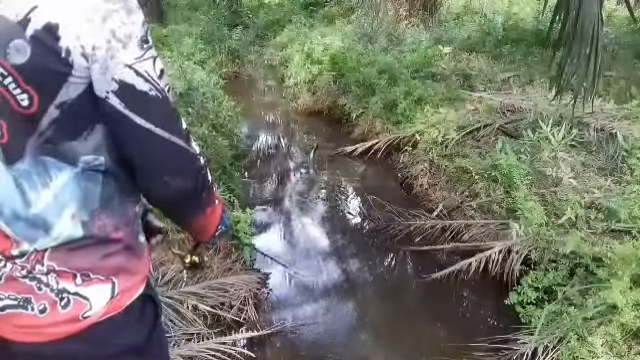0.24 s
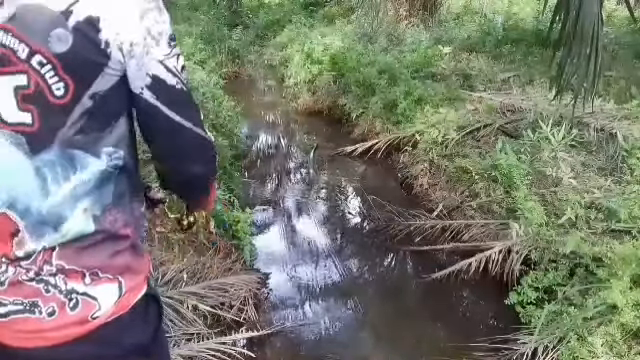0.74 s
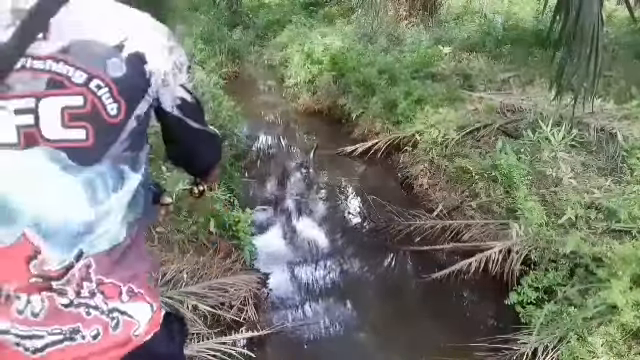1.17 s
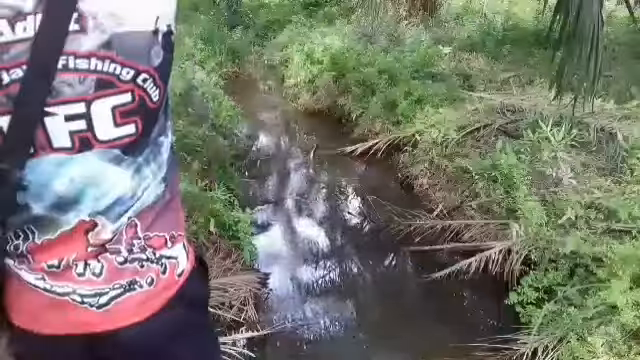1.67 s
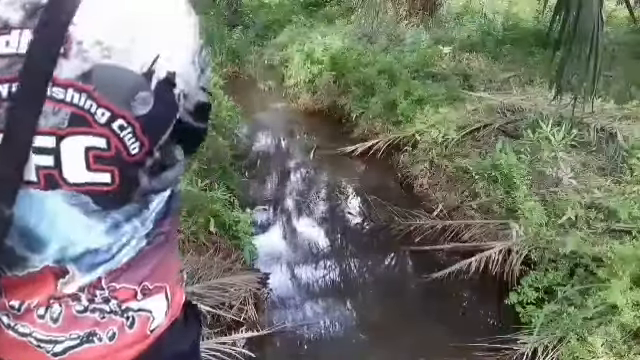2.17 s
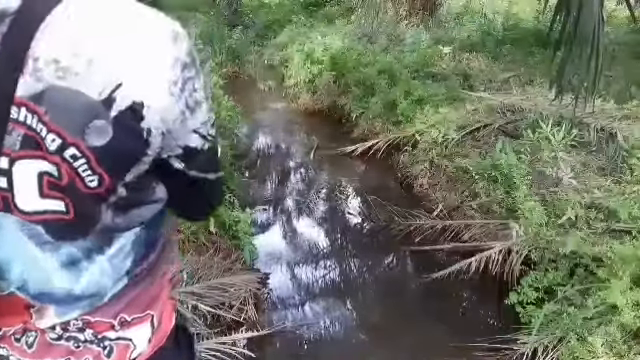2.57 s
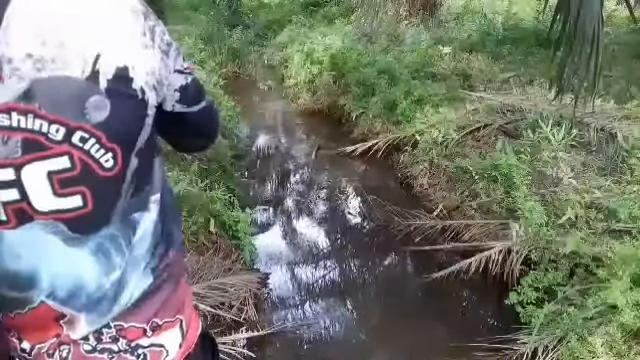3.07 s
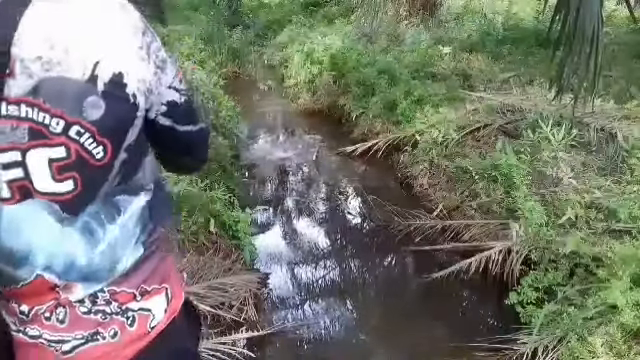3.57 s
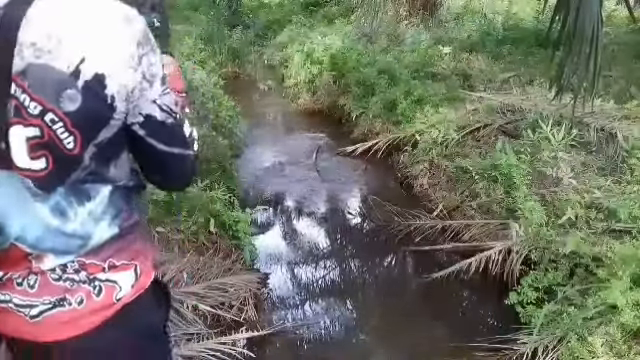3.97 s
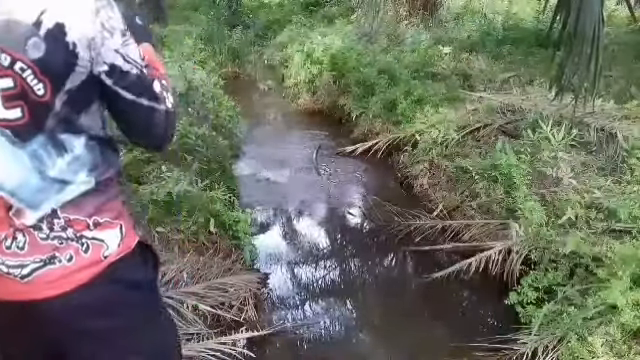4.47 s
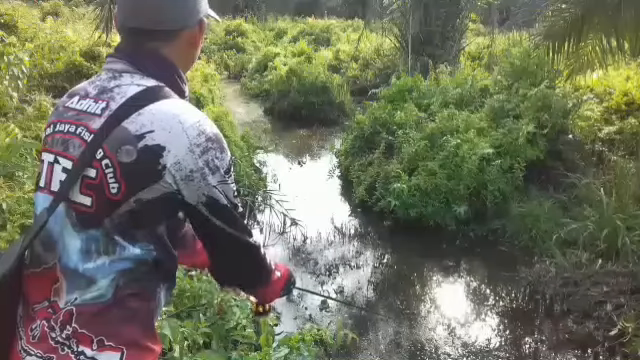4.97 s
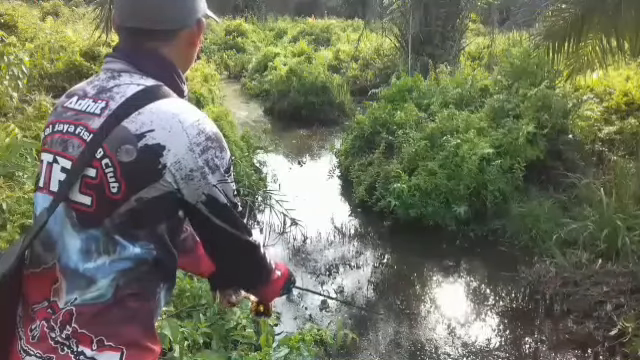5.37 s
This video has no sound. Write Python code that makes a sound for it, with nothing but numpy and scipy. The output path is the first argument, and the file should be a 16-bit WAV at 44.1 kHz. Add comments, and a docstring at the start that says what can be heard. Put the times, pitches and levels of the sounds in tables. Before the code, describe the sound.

Dry palm fronds snap, crackle and rustle underfoot with a brief bell jingle, then water thrashes and splashes before an abrupt cut to quiet birdsong.

```python
"""On the bank of a ditch an angler shifts his footing through dry palm fronds: stems snap as clicks with tearing
noise, leaflets and litter crackle as clumped grains, and the little bells on his rod ring from rattling strikes.
Then something thrashes in the water, with noisy slaps, spray and ringing bubbles, over a cricket's pulsing tone.
The scene changes abruptly to a quiet stretch of the ditch: small birds chirp in gliding sines and insects shrill
as narrow hiss."""
import sys
import numpy as np
from scipy import signal
from scipy.fft import rfft, irfft, next_fast_len
from scipy.io import wavfile

SR = 44100
rng = np.random.default_rng(int(sys.argv[2]) if len(sys.argv) > 2 else 0)


def unload_audio(sound):
    """Save the sound as a 16-bit wav file, at the path given as the first command line argument."""
    columns = np.transpose(np.atleast_2d(sound))
    # keep every value between -1 and 1, then stretch to whole-number steps
    steps = np.round(np.clip(columns, -1, 1) * 32767)
    wavfile.write(sys.argv[1], SR, steps.astype(np.int16))


N = 248283
TIME = np.arange(N) / SR
CHANGE_S = 4.821
CUTOFF_HZ = 15600

# snapping stems, thick ones heavy and dry ones sharp: t/s, crack level/dB before the band levels,
# weight level/dB, sharpness level/dB
STEM_SNAPS = [(0.8177, -59, 12, -7), (1.1133, -58, 11, -11), (1.261, -52, 7, -14),
              (1.2911, -48.5, 9.5, -19), (1.317, -32.5, -8, -13), (1.33, -43, -12, -6),
              (1.3392, -47, 13, -3), (1.407, -45, 14.5, 10), (1.4503, -42, -4, -17), (1.523, -33, -25, -11),
              (1.568, -45, 5, 0), (1.5971, -31, 5, 5.5), (1.629, -38.5, -1, 1), (1.7116, -44.5, 5.5, -6),
              (1.8889, -36.5, -3, -5), (1.9628, -31.5, 6.5, 6.5), (1.9856, -38, 4, 2), (2.0088, -41, 3, 10),
              (2.013, -40, 3, 5), (2.0353, -45, 12.5, 9), (2.0486, -43, -1, 8.5), (2.1127, -25, 2.5, -0.5),
              (2.155, -45.5, -1, 6), (2.191, -45.5, 3, -10), (2.2188, -44.5, 11, -5), (2.3031, -40, 7, 0),
              (2.3335, -49, -7, 9.5), (2.382, -43.5, 3, 5), (2.397, -28.5, 3, 14.5), (2.4156, -32.5, 2, -6),
              (2.4835, -47.5, 4, 3), (2.568, -32, -10, -18), (2.585, -46, 22, -24), (2.736, -47, -23, -10),
              (2.782, -57, 10, 13.5), (2.794, -47, 3.5, 8), (3.0925, -47.5, 7, -18),
              (3.1142, -54, 16.5, -21)]
# bands of a snap: low f/Hz, high f/Hz, relative level/dB, tearing t/s, share of the weight [1], of the sharpness [1]
SNAP_BANDS = [(634, 1590, -20, 0.0027, 1.0, 0.19), (269, 550, -32, .002, 1.0, 0.2),
              (1240, 3470, -12.5, 0.0023, 0.9, 0), (3420, 5110, 0, 0.0012, 0.044, 0.039),
              (5430, 6930, -13.5, 0.00071, 0.15, 0.66), (10400, 17000, -25, 0.00084, 0.22, 0.41),
              (7660, 9200, -23.5, 0.00068, 0, 1.52)]

# how much the undergrowth is stirred: t/s, level/dB
STIR = [(0.7, -83), (1.02, -82), (1.11, -68.5), (1.29, -67), (1.42, -57), (2.48, -56.5), (2.8, -59),
        (3.05, -70), (3.2, -63.5), (3.38, -59.5)]
# a frond sweeps along the body: t/s, hold t/s, level/dB
FROND_SWEEPS = [(0.81, .01, -69), (1.325, 0.014, -54), (1.41, .005, -49.5), (1.505, 0.097, -44.5),
                (1.88, .015, -47), (1.965, 0.022, -45.5), (2.025, .005, -50), (2.222, 0.0043, -51),
                (2.31, 0.03, -53.5), (2.41, 0.043, -53)]
SWEEP_ATTACK_S, SWEEP_RELEASE_S = 0.024, 0.034
# weight comes down on the litter: t/s, hold t/s, level/dB
FOOTSTEPS = [(1.41, 0.0045, -57.5), (1.475, 0.013, -49.5), (1.643, 0.017, -52.5), (1.89, 0.0042, -56),
             (2.22, 0.0047, -51), (2.32, 0.04, -61), (2.83, 0.1, -60)]
STEP_ATTACK_S, STEP_RELEASE_S = 0.019, 0.032
# colour of the leaflets flicking: f/Hz, relative level/dB
LEAFLET_COLOUR = [(100, -43), (900, -22.5), (2000, -12), (3000, -10), (4300, 3.5), (5400, -9),
                  (7500, -20.5), (9000, -21.5), (11500, -32), (15500, -30)]
# colour of single leaflets cracking: f/Hz, relative level/dB
CRACKLE_COLOUR = [(1200, -9), (2200, 0.5), (3200, 1.5), (4400, -1), (6000, -9.5), (9000, -26)]
# colour of small twigs ticking: f/Hz, relative level/dB
TWIG_COLOUR = [(200, -20), (900, -4), (2500, -3), (4200, 6), (5600, -9), (9000, -25), (15500, -22)]
# colour of the crushed litter: f/Hz, relative level/dB
LITTER_COLOUR = [(40, -6), (120, -8), (250, -2.5), (500, 2.5), (900, 2.5), (1400, 1), (2200, -1),
                 (4000, -4), (9000, -33)]
# a boot rubs softly with a hollow note: t/s, hold t/s, level/dB
BOOT_RUB = (3.7, 0.067, -61.5)
RUB_HZ, RUB_WIDTH_HZ = 1450, 170

# the rod is jolted and shakes its twin bells: t/s, hold t/s, low bell level/dB, high bell level/dB before the trims
ROD_JOLTS = [(1.51, 0.059, -48, -60.5), (1.58, 0.0091, -47, -51.5), (1.792, .03, -71, -69),
             (2.998, 0.018, -71, -83)]
JOLT_ATTACK_S, JOLT_RELEASE_S = 0.021, 0.037
# modes of the low bell: f/Hz, relative level/dB, t60 t/s
LOW_BELL_MODES = [(6420, -1, 0.05), (6300, -3, 0.029), (6770, -6, 0.034), (12000, -23, .02),
                  (13400, -22, .02)]
# modes of the high bell: f/Hz, relative level/dB, t60 t/s
HIGH_BELL_MODES = [(9890, -6, 0.04), (10020, -2.5, 0.036), (14900, -11, .015), (15100, -11, .015)]

# unrest of the water, before the trims of spray and bubbles: t/s, level/dB
WATER_UNREST = [(3.22, -85), (3.37, -68), (3.42, -49.5), (3.72, -53.5), (4.1, -48), (4.3, -52), (4.55, -50),
                (4.7, -53.5), (4.77, -60.5), (4.83, -51.5)]
# thrashes at the surface, before the trims: t/s, slap level/dB, spray level/dB, bubbles level/dB
THRASHES = [(3.277, -54, -71, -54), (3.386, -27, -49, -52.5), (3.6093, -36, -54, -50),
            (3.726, -34, -73, -51.5), (3.781, -44, -51, -49.5), (3.873, -37, -49, -50.5),
            (4.023, -39, -44.5, -52), (4.105, -52, -61, -50), (4.16, -25.5, -45.5, -49),
            (4.484, -45, -61, -48), (4.56, -36, -48.5, -44.5), (4.596, -34, -63, -45),
            (4.705, -53, -50.5, -52), (4.8104, -35, -49, -63)]
THRASH_ATTACK_S, THRASH_HOLD_S, SPRAY_RELEASE_S, BUBBLE_RELEASE_S = 0.011, 0.019, 0.04, 0.041
# the thrashing digs deepest midway and draws gulps of air: t/s, hold t/s, level/dB against the small bubbles
DEEP_CHURN = (3.75, 0.045, -8.5)
DEEP_ATTACK_S, DEEP_RELEASE_S = 0.41, 0.45
# colour of the spray: f/Hz, relative level/dB
SPRAY_COLOUR = [(100, -16.5), (800, -20.5), (1800, -7.5), (3000, -4), (3800, 3), (4400, 5), (5300, -5),
                (7000, -18.5), (10000, -29), (15500, -41)]
# colour of single drips: f/Hz, relative level/dB
DRIP_COLOUR = [(1500, -6), (2300, 2), (3200, 0), (4600, -1)]
# colour of the small bubbles: f/Hz, relative level/dB
BUBBLE_COLOUR = [(400, -23), (600, -18), (800, -0.5), (1400, 1), (2200, -4.5), (3200, -9.5)]
# colour of the deep gulps: f/Hz, relative level/dB
GULP_COLOUR = [(130, -24), (280, -7.5), (480, 0), (700, -1)]
# the largest air pockets closing: t/s, peak level/dB before the trim, starting f/Hz
AIR_POCKETS = [(3.284, -47.5, 680), (3.396, -34, 1105), (3.412, -36.5, 2110), (3.417, -40.5, 750),
               (3.437, -40.5, 880), (3.573, -34, 1450), (3.582, -41, 746), (3.656, -39.5, 886),
               (3.77, -47.5, 297), (4.071, -40, 1240), (4.129, -37.5, 1146), (4.16, -35.5, 1240),
               (4.424, -30.5, 2970), (4.488, -45.5, 760), (4.565, -38.5, 976), (4.608, -36, 722),
               (4.703, -37.5, 2250), (4.73, -40.5, 900)]
# colour of water slapped flat: f/Hz, relative level/dB
SPLAT_COLOUR = [(100, -31), (500, -24), (1000, -4), (2200, 0.5), (3000, 1), (4400, 6), (5400, -9.5),
                (7000, -51), (15500, -44)]

# bird chirps: t/s, length t/s, middle f/Hz, glide f/Hz from start to end, peak level/dB before the trim
BIRD_CHIRPS = [(4.287, 0.065, 3710, 4, -47), (4.329, 0.0497, 3690, 454, -44), (4.877, .031, 3980, 203, -58),
               (4.909, 0.042, 4290, -350, -57), (5.03, 0.064, 2500, 450, -71),
               (5.066, .043, 3730, -200, -67), (5.133, 0.026, 4500, -400, -51),
               (5.218, 0.03, 4080, 222, -57.5), (5.246, 0.013, 3820, -750, -62),
               (5.33, 0.039, 4000, -550, -51.5), (5.345, 0.018, 2340, 300, -68),
               (5.389, 0.031, 4303, -600, -56), (5.419, 0.018, 3770, 380, -55),
               (5.449, .024, 4660, -450, -57.5), (5.479, 0.019, 3800, -1000, -63),
               (5.515, .032, 4080, 44, -51), (5.538, 0.022, 4100, -1300, -53.5),
               (5.568, .019, 3580, 440, -60), (5.575, 0.0324, 3610, -1050, -57.5)]
# more birds twitter further off in the second scene; the level is before the same trim
TWITTER_NOTES, TWITTER_NOTE_S, TWITTER_DB = 16, 0.0244, -68
TWITTER_HZ, TWITTER_SPREAD_HZ, TWITTER_GLIDE_HZ = 4000, 450, -700

# shrilling insects after the change of scene: f/Hz, width f/Hz, level/dB
INSECT_BANDS = [(8130, 280, -79), (8480, 240, -79.5), (9300, 910, -80.5)]
# colour of the still air before the change of scene: f/Hz, relative level/dB
NEAR_AIR = [(25, -22), (50, -9), (100, -10.5), (150, -6.5), (300, -8), (750, -11), (1500, -14),
            (2800, -19.5), (3900, -21), (5500, -25), (9300, -24), (11500, -26), (15500, -27)]
# colour of the still air after the change of scene: f/Hz, relative level/dB
FAR_AIR = [(25, -9), (50, -12), (100, -13.5), (200, -9.5), (500, -9.5), (1200, -13.5), (2400, -16),
           (3000, -19.5), (4400, -18.5), (5400, -23), (7000, -24.5), (15500, -28)]
NEAR_AIR_DB, FAR_AIR_DB = -67.5, -67.5
# left-right likeness of the air: f/Hz, correlation [0-1]
AIR_LIKENESS = [(30, 0.9), (100, 0.58), (300, 0.59), (1000, 0.34), (4000, 0.25), (8500, 0), (13000, 0)]


def from_db(db):
    """Decibels to an amplitude gain."""
    return 10 ** (np.asarray(db) / 20)


def rms_one(x):
    """Scale a sound to an RMS of 1."""
    return x / np.sqrt(np.mean(x ** 2) + 1e-20)


def gains(rows):
    """A level curve as a gain at every sample, silent outside its span."""
    s, db = np.transpose(rows)
    return from_db(np.interp(TIME, s, db, left=-200, right=-200))


def at_hz(points, hz):
    """Read a spectrum at any frequency, interpolating along log frequency."""
    points_hz, values = np.transpose(points)
    return np.interp(np.log(hz + 1), np.log(points_hz), values)


def add(out, s, sound):
    """Mix a sound in at time s."""
    at = max(round(s * SR), 0)
    out[at:at + len(sound)] += sound[:max(N - at, 0)]


def band(x, low_hz, high_hz):
    """Band-pass filter."""
    return signal.sosfilt(signal.butter(2, [low_hz, high_hz], "band", fs=SR, output="sos"), x)


def colour(x, spectrum):
    """Causal (minimum-phase) filter with the given spectrum."""
    size = 2 * next_fast_len(N // 2 + 4096)
    level_db = at_hz(spectrum, np.arange(size // 2 + 1) * SR / size)
    cepstrum = irfft(np.log(from_db(level_db)))
    # folding the cepstrum forward in time makes the filter causal
    cepstrum[1:size // 2] *= 2
    cepstrum[size // 2 + 1:] = 0
    return irfft(rfft(x, size) * np.exp(rfft(cepstrum)))[..., :N]


def drift(rate):
    """Slow smooth chance with a spread of 1, computed at every 40th sample."""
    r = np.exp(-80 * np.pi * rate / SR)
    noise = rng.standard_normal(N // 40 + 2002)
    slow = signal.lfilter([1], [1, -2 * r, r * r], noise)[2000:]  # skip the run-in
    return np.interp(np.arange(N) / 40, np.arange(len(slow)), rms_one(slow))


def grains(per_s, spread_db, clump_db):
    """Random clicks of uneven size and either sign that come in clumps; sizes and clumps are capped."""
    sizes = from_db(spread_db * np.minimum(rng.exponential(1, N), 4)) * rng.choice([-1, 1], N)
    clumps = np.minimum(drift(57), 1.5)
    happens = rng.random(N) < per_s / SR
    return sizes * happens * from_db(clump_db * clumps)


def ring(clicks, hz, t60):
    """A unit click sets a decaying sine of height 1 ringing."""
    r, w = from_db(-60 / (t60 * SR)), 2 * np.pi * hz / SR
    return signal.lfilter([0, np.sin(w)], [1, -2 * r * np.cos(w), r * r], clicks + 1e-18)


def ringing_grains(spectrum, per_s, cycles, spread_db, count=28):
    """Grains of all pitches, each ringing for some cycles; they radiate little below their pitch."""
    born = grains(per_s, spread_db, clump_db=2.0)
    dealt = rng.integers(0, count, N)  # which pitch each grain gets
    rings = np.zeros(N)
    for k, hz in enumerate(np.geomspace(spectrum[0][0], spectrum[-1][0], count)):
        rings += from_db(at_hz(spectrum, hz)) * ring(born * (dealt == k), hz, cycles / hz)
    return rms_one(np.diff(rings, prepend=0))


def swells(rows, attack_s, release_s):
    """Each (s, hold s, dB) rises to its level at s, holds and dies away exponentially; their powers add up."""
    power = np.zeros(N)
    for s, hold_s, db in rows:
        fall = np.maximum(s - TIME, 0) / attack_s + np.maximum(TIME - s - hold_s, 0) / release_s
        power += (from_db(db) * np.exp(-np.minimum(fall, 20))) ** 2
    return np.sqrt(power)


def snaps(tearing=0.36, edge=0.031):
    """A stem breaks with one sharp release, then its fibres tear for a millisecond or two."""
    out, t = np.zeros(N), TIME[:SR // 50]
    for s, crack_db, weight_db, sharp_db in STEM_SNAPS:
        for low_hz, high_hz, db, decay_s, heavy, sharp in SNAP_BANDS:
            fibres = tearing * rng.standard_normal(len(t)) * np.exp(-t / decay_s)
            force = (t == 0) + fibres
            crack = band(force, low_hz, high_hz)
            if low_hz == SNAP_BANDS[-1][0]:  # the edge of the tick reaches the highest treble
                crack += edge * np.diff(force, prepend=0)
            gain = from_db(crack_db + db + heavy * weight_db + sharp * sharp_db)
            add(out, s, gain * crack / np.std(crack[:SR // 250]))
    return out


def rustle(leaf_db=-0.5, crackle_db=-10.5, litter_db=-65.0, litter_follows=0.59, twig_db=-9.0):
    """Leaflets flick past each other, a few crack and small twigs tick, while the litter is crushed underfoot."""
    stir = gains(STIR)
    leaves = np.hypot(stir, swells(FROND_SWEEPS, SWEEP_ATTACK_S, SWEEP_RELEASE_S))
    loose_litter = from_db(litter_db) * (stir / stir.max()) ** litter_follows
    crunch = np.hypot(loose_litter, swells(FOOTSTEPS, STEP_ATTACK_S, STEP_RELEASE_S))
    flicks = rms_one(colour(grains(per_s=2500, spread_db=1.5, clump_db=3.5), LEAFLET_COLOUR))
    cracks = ringing_grains(CRACKLE_COLOUR, per_s=160, cycles=11.4, spread_db=1.5)
    twigs = rms_one(colour(grains(per_s=50, spread_db=4.0, clump_db=1.0), TWIG_COLOUR))
    crushed = rms_one(colour(grains(per_s=1500, spread_db=1.0, clump_db=2.0), LITTER_COLOUR))
    leaflets = leaves * (from_db(leaf_db) * flicks + from_db(crackle_db) * cracks)
    return leaflets + from_db(twig_db) * stir * twigs + crunch * crushed


def rub():
    """Fine slips ring one broad resonance as the boot rubs."""
    slips = grains(per_s=2500, spread_db=3.0, clump_db=1.5)
    hollow = band(slips, RUB_HZ - RUB_WIDTH_HZ / 2, RUB_HZ + RUB_WIDTH_HZ / 2)
    return swells([BOOT_RUB], STEP_ATTACK_S, STEP_RELEASE_S) * rms_one(hollow)


def rod_bells(level_db=-3.5, scrape_db=-21.0):
    """A pellet rattles inside each small shell, strikes every mode anew and scrapes along the wall."""
    out = np.zeros(N)
    starts, holds, *strengths = np.transpose(ROD_JOLTS)
    for strength_db, modes in zip(strengths, (LOW_BELL_MODES, HIGH_BELL_MODES)):
        shake = swells(zip(starts, holds, strength_db), JOLT_ATTACK_S, JOLT_RELEASE_S)
        rattle = grains(per_s=600, spread_db=1.0, clump_db=0.0)
        scrape = rms_one(band(rng.standard_normal(N), 5500, 15000))
        out += from_db(scrape_db) * shake * scrape
        for hz, db, t60 in modes:
            strikes = rattle * rng.standard_normal(N)
            steady = np.std(ring(strikes, hz, t60))  # loudness under an unchanging rattle
            out += from_db(db + level_db) * ring(strikes * shake, hz, t60) / steady
    return out


def slaps(level_db=-12.0, decay_s=0.015):
    """Each thrash begins with a slap that throws up a short, dense burst of spray."""
    force, t = np.zeros(N), TIME[:SR // 8]
    for s, db, _, _ in THRASHES:
        add(force, s, from_db(db + level_db) * np.exp(-t / decay_s))
    droplets = grains(per_s=6000, spread_db=2.0, clump_db=1.5)
    return force * rms_one(colour(droplets, SPLAT_COLOUR))


def churn(spray_db=-1.0, drip_db=-10.5, bubble_db=-1.5, simmer_db=-2.5, top_hz=11000):
    """With each thrash, spray and single drips patter over a cloud of small bubbles and a few deep ones."""
    unrest = gains(WATER_UNREST)
    spray_rows = [(s, THRASH_HOLD_S, db) for s, _, db, _ in THRASHES]
    bubble_rows = [(s, THRASH_HOLD_S, db) for s, _, _, db in THRASHES]
    spray = np.hypot(unrest, swells(spray_rows, THRASH_ATTACK_S, SPRAY_RELEASE_S))
    trapped = swells(bubble_rows, THRASH_ATTACK_S, BUBBLE_RELEASE_S)
    bubbles = np.hypot(from_db(simmer_db) * unrest, trapped)
    gulps = bubbles * swells([DEEP_CHURN], DEEP_ATTACK_S, DEEP_RELEASE_S)
    mist = rms_one(colour(grains(per_s=5000, spread_db=2.5, clump_db=1.33), SPRAY_COLOUR))
    drip_rings = ringing_grains(DRIP_COLOUR, per_s=260, cycles=34, spread_db=3.5)
    bubble_rings = ringing_grains(BUBBLE_COLOUR, per_s=990, cycles=34.0, spread_db=2.0)
    gulp_rings = ringing_grains(GULP_COLOUR, per_s=450, cycles=12, spread_db=0.0)
    rings = from_db(drip_db) * spray * drip_rings + from_db(bubble_db) * bubbles * bubble_rings + gulps * gulp_rings
    soft_rings = signal.sosfilt(signal.butter(2, top_hz, fs=SR, output="sos"), rings)
    return from_db(spray_db) * spray * mist + soft_rings


def plops(level_db=-1.0, cycles=3.5, rise=0.026, swell_s=0.00059):
    """Large bubbles ring and rise in pitch as they near the surface."""
    out, t = np.zeros(N), TIME[:SR // 12]
    for s, db, hz in AIR_POCKETS:
        age = t * hz / cycles
        shape = np.exp(-age) * (1 - np.exp(-t / swell_s))
        tone = np.sin(2 * np.pi * hz * t * (1 + rise * age / 2))
        add(out, s, from_db(db + level_db) * shape / shape.max() * tone)
    return out


def birds(level_db=0.5, waver=0.012, easing=0.61):
    """Each chirp is a near sine that glides fast at first and then eases off."""
    out, unsteady = np.zeros(N), 1 + waver * drift(150)
    for s, length_s, pitch_hz, glide_hz, db in BIRD_CHIRPS + twitter():
        u = np.linspace(-.5, .5, round(length_s * SR))
        glide = pitch_hz + glide_hz * (u - easing * u ** 2)
        hz = glide * np.roll(unsteady, -round(s * SR))[:len(u)]
        tone = np.sin(2 * np.pi * np.cumsum(hz) / SR)
        add(out, s, from_db(db + level_db) * np.cos(np.pi * u) ** 2 * tone)
    return out


def twitter():
    """Faint short notes at random times and pitches, most of them falling."""
    when = rng.uniform(CHANGE_S, N / SR, TWITTER_NOTES)
    chance = np.clip(rng.standard_normal((TWITTER_NOTES, 2)), -2, 2)
    return [(s, TWITTER_NOTE_S, TWITTER_HZ + TWITTER_SPREAD_HZ * high, TWITTER_GLIDE_HZ * (1 + steep), TWITTER_DB)
            for s, (high, steep) in zip(when, chance)]


def cricket(pitch_hz=8420, strokes_per_s=18.0, sag_hz=220, chorus_db=-91.0):
    """Each wing stroke is a short tone that sags in pitch; others hiss faintly further off."""
    stroke = np.cumsum(strokes_per_s * (1 + 0.03 * drift(1)) / SR) % 1  # place within the stroke, 0-1
    hz = pitch_hz - sag_hz * (stroke - .5) + 45 * drift(153)
    level_db = np.interp(TIME, [.15, .3, 1, 3], [-84, -76, -77.5, -73.5])
    song = np.sin(np.pi * stroke) ** 2 * np.sin(2 * np.pi * np.cumsum(hz) / SR)
    chorus = rms_one(band(rng.standard_normal(N), 9200, 9700))
    return from_db(level_db) * song + from_db(chorus_db) * chorus


def shrill():
    """Many far insects blend into narrow bands of hiss."""
    out = np.zeros(N)
    for hz, width_hz, db in INSECT_BANDS:
        hiss = band(rng.standard_normal(N), hz - width_hz / 2, hz + width_hz / 2)
        out += from_db(db) * rms_one(hiss)
    return out


def air(spectrum, level_db):
    """Soft steady noise, partly alike in both ears."""
    mid, side = rfft(colour(rng.standard_normal((2, N)), spectrum))
    alike = np.clip(at_hz(AIR_LIKENESS, np.arange(len(mid)) * SR / N), 0, 1)
    stereo = np.sqrt(1 + alike) * mid + np.sqrt(1 - alike) * side * [[1], [-1]]
    return from_db(level_db) * rms_one(irfft(stereo, N))


def thicket(x, wet_db, decay_s, width):
    """Leaves and ground scatter a brief, nearly central tail of decaying noise after 2 ms."""
    t = TIME[:SR // 5]
    mid, side = rng.standard_normal((2, len(t))) * np.exp(-t / decay_s) * (t > .002)
    echoes = (mid + width * side * [[1], [-1]]) / np.linalg.norm(mid)
    # colour of the tail: f/Hz, relative level/dB
    scattered = colour(x, [(300, -7.0), (1000, 1.0), (2800, -4), (4400, -1.0), (5800, -4.5), (14000, 4.5)])
    return x + from_db(wet_db) * signal.fftconvolve(scattered[None], echoes, axes=1)[:, :N]


def scene():
    """The near bank gives way abruptly to the quiet stretch; birds call in both."""
    first = np.clip((CHANGE_S - TIME) * 1000, 0, 1)  # a 1 ms crossfade
    stems = thicket(snaps(), wet_db=-10.0, decay_s=0.019, width=0.01)
    leaves = thicket(rustle() + rub(), wet_db=-8.5, decay_s=0.012, width=0.02)
    water = thicket(slaps() + churn() + plops(), wet_db=-10.0, decay_s=0.027, width=0.017)
    near = stems + leaves + rod_bells() + water + cricket() + air(NEAR_AIR, NEAR_AIR_DB)
    far = shrill() + air(FAR_AIR, FAR_AIR_DB)
    calls = thicket(birds(), wet_db=-6.0, decay_s=0.073, width=0.042)
    return first * near + (1 - first) * far + calls


def record(dry, offset=-0.00055):
    """A steep filter cuts the top; the converter rests slightly off zero."""
    return signal.sosfilt(signal.ellip(10, .1, 70, CUTOFF_HZ, fs=SR, output="sos"), dry) + offset


dry = scene()
out = record(dry)
unload_audio(out)
```